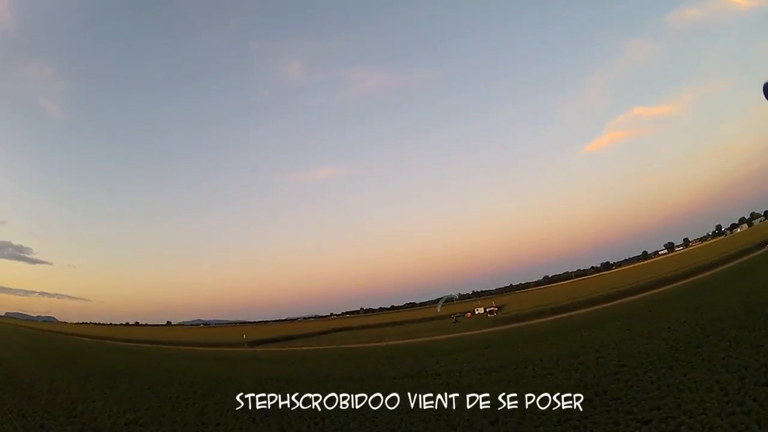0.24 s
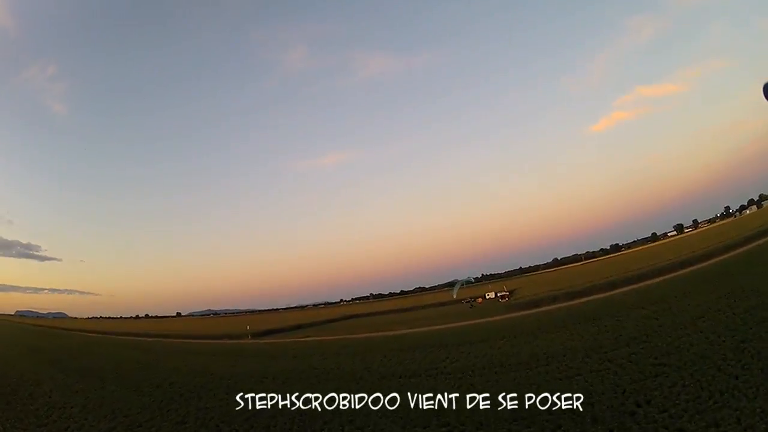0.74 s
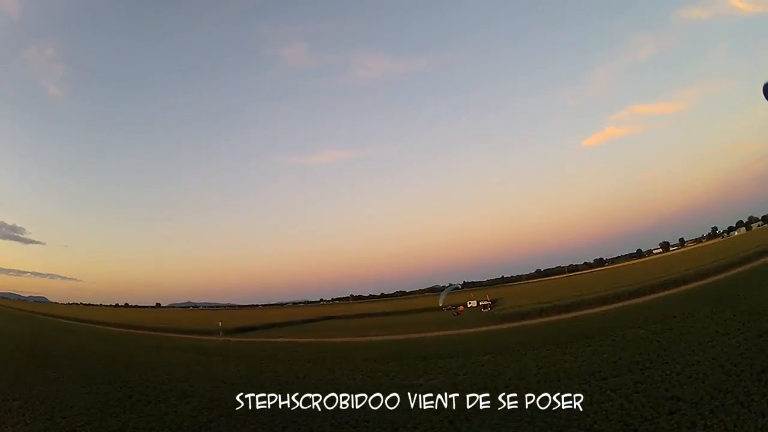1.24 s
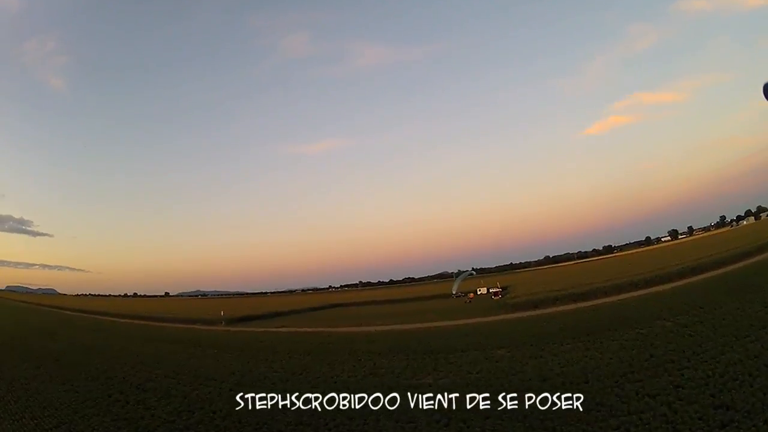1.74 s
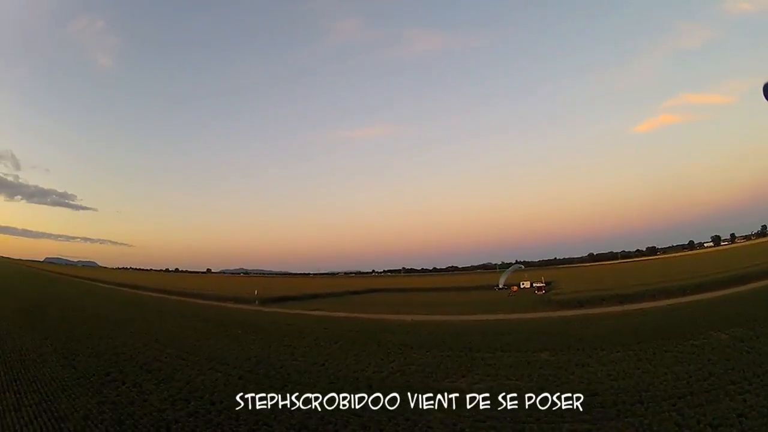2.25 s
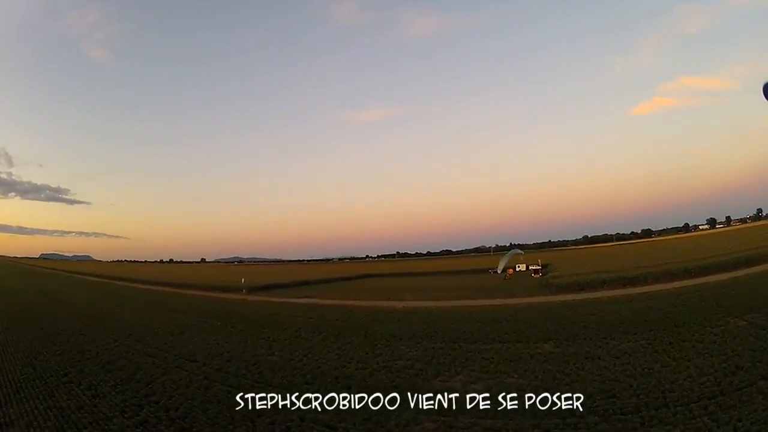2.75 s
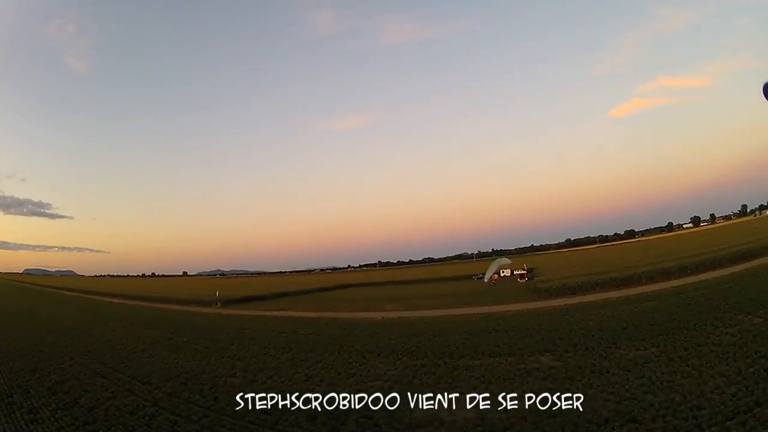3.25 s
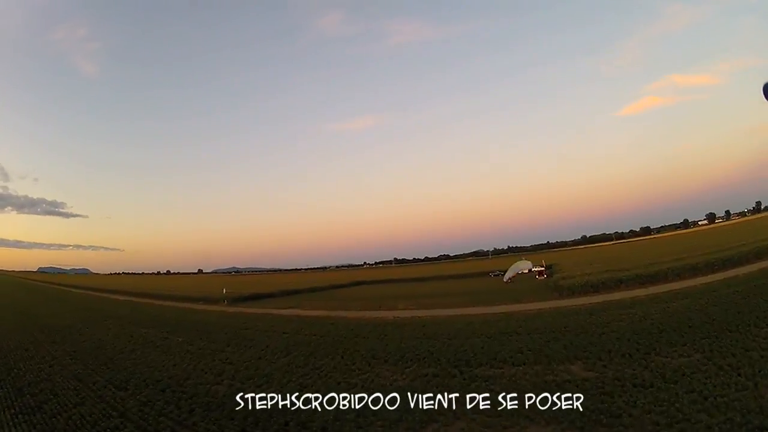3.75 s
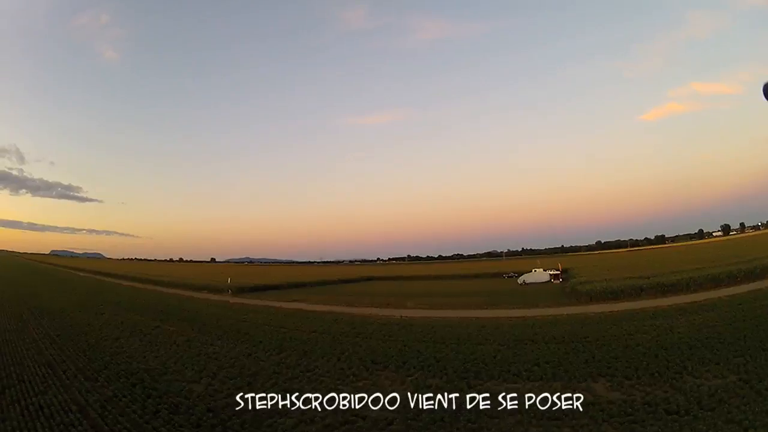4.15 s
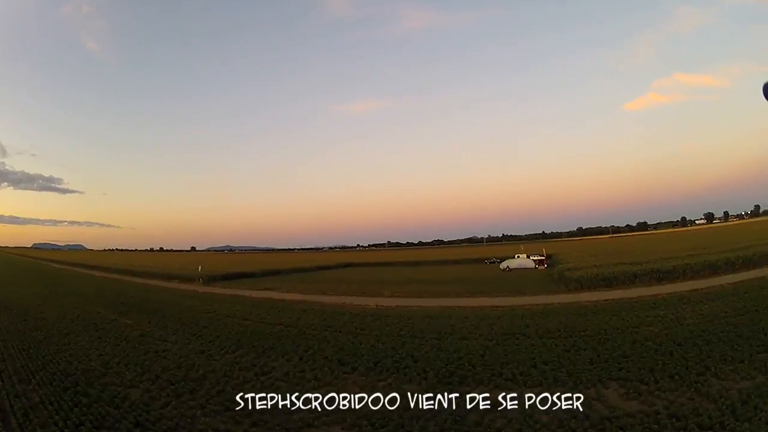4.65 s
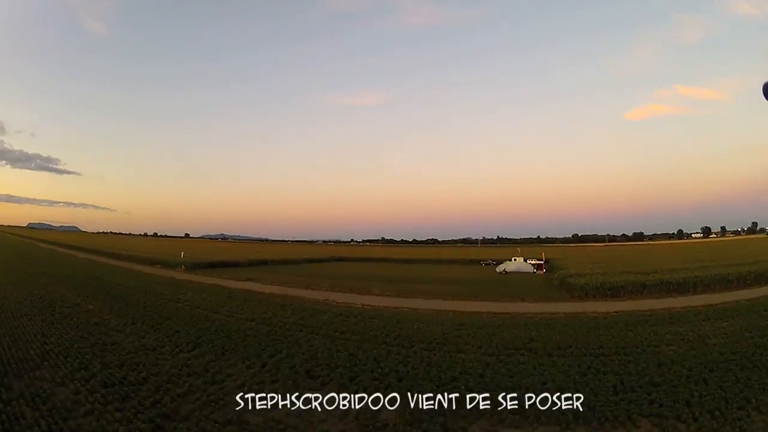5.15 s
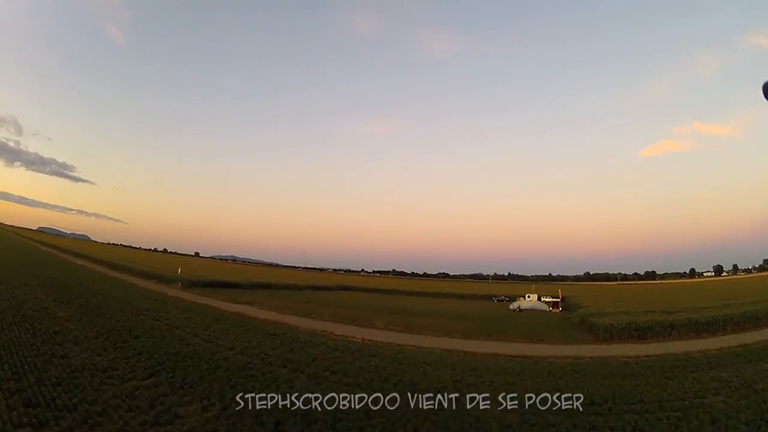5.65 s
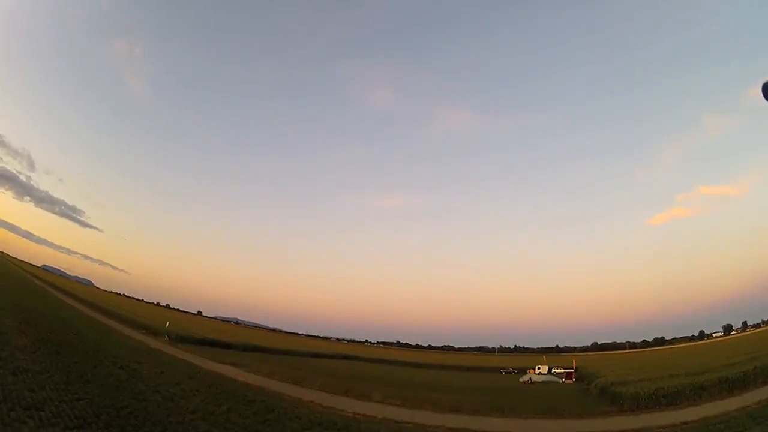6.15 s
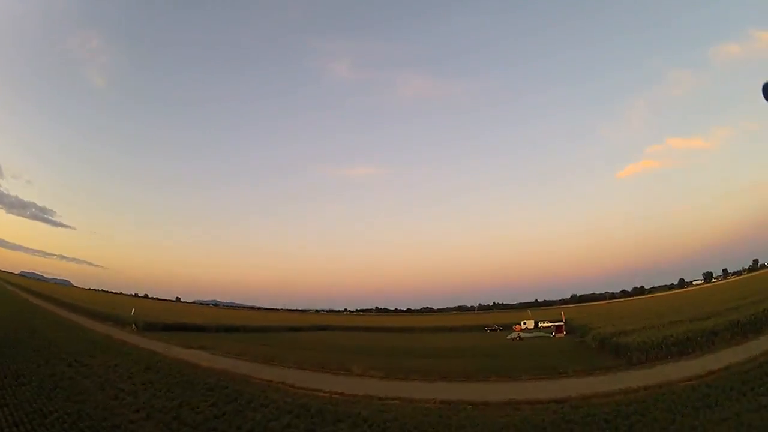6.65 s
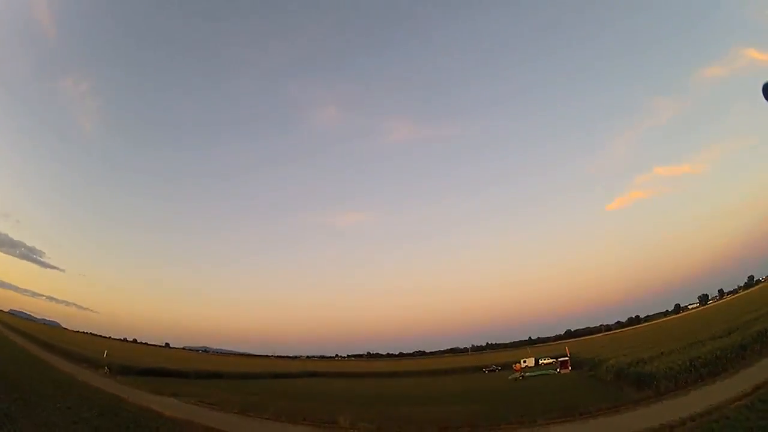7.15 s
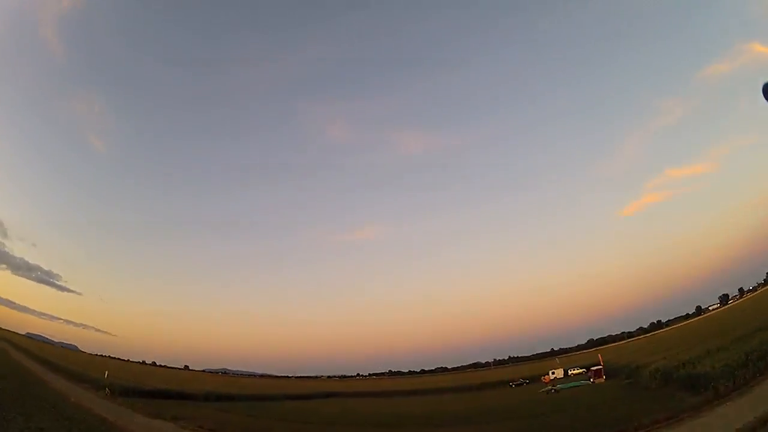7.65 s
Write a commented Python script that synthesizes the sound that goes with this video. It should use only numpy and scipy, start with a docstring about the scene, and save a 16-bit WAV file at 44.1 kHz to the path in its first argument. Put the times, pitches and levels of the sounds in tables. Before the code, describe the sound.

A small two-stroke engine and belt-driven two-blade propeller run without pause for eight seconds, right behind a microphone in a closed hard case. From 0 to 1 s the buzzing drone sits near 112 Hz, then sags to about 105 Hz around 2.2 s, its hum flickering unevenly. From 2.5 s it revs up, passing 120 Hz near 4 s and reaching a steady 125 Hz around 6 s; the low hum is strongest and most throbbing between 5 and 6.2 s. After 6.8 s the exhaust softens and the pitch slides down to about 110 Hz by the end. Throughout, exhaust crackle, blade slaps and gusting slipstream make a boxy, hollow roar over lumpy rumble. Dull mount thumps fall near 1.5, 4.6 and, most clearly, 6.3 s. The sound is dry, close, mono and coarse, with a gritty metallic edge in the treble.

```python
"""Two-stroke propeller engine, close up

A small two-stroke engine drives a two-blade propeller through a belt, right behind a camera in a closed case.
Firing and blade tones shake the mount and mix there, over lumpy low noise and a few short thumps.
Exhaust cracks, blade slaps and slipstream noise reach the one microphone through the ringing case.
The recorder samples slowly and holds each value, which mirrors the sound around its sampling rate."""
import sys
import numpy as np
from scipy import signal
from scipy.fft import rfft, irfft, next_fast_len
from scipy.io import wavfile
from scipy.ndimage import uniform_filter1d

SR = 44100
rng = np.random.default_rng(int(sys.argv[2]) if len(sys.argv) > 2 else 0)


def file_out(sig):
    """Save sig as 16-bit WAV at sys.argv[1]."""
    # one column per channel
    cols = np.atleast_2d(sig).T
    # limit, then scale
    lim = np.clip(cols, -1, 1)
    pcm = np.round(lim * 32767).astype(np.int16)
    wavfile.write(sys.argv[1], SR, pcm)


N = 348374
T = np.arange(N) / SR  # time [s]

# Engine speed: (time [s], firing rate [Hz], lead of the propeller as the belt creeps [blade passes])
SPEED = [(0.0, 112.0, -0.021), (0.4, 111.8, -0.022), (0.65, 110.95, -0.026), (1.2, 110.0, -0.041),
         (1.9, 105.85, -0.06), (2.2, 105.45, -0.089), (2.6, 107.35, -0.11), (3.0, 111.15, -0.125),
         (3.2, 112.7, -0.129), (4.0, 120.95, -0.136), (4.4, 122.6, -0.131), (5.2, 124.3, -0.124),
         (6.0, 125.05, -0.082), (6.6, 125.0, -0.078), (6.85, 124.35, -0.077), (7.1, 121.8, -0.065),
         (7.6, 116.3, -0.068), (7.9, 109.75, -0.069)]
BLADES_PER_FIRING = .5204  # blade passes per firing: two blades over the belt reduction
CRUISE_HZ = 115  # firing rate at which the speed-dependent levels hold

# Strong mount tones, firing tone first: (multiple of firing rate [-], multiple of blade rate [-])
STRONG_TONES = [(1, 0), (2, 0), (3, 0), (1, -1), (1, 1), (0, 1), (0, 3), (0, 4), (0, 5), (0, 8), (0, 9),
                (1, 2)]
# Firing tone in the mount: (time [s], level [dB])
FIRING_TONE = [(0.0, -22.5), (0.2, -18), (0.42, -22), (0.55, -20), (0.77, -18.5), (0.88, -29), (1.2, -30),
               (1.45, -27), (1.76, -27), (2.09, -31.5), (2.2, -17), (2.42, -29), (2.64, -18.5),
               (2.97, -31.5), (3.08, -28), (3.4, -23), (3.96, -22), (4.18, -19.5), (4.62, -20), (4.84, -26),
               (5.06, -17), (5.55, -10.5), (5.72, -15), (5.94, -8), (6.16, -16), (6.27, -24), (6.38, -21),
               (6.5, -32), (6.71, -22.5), (6.93, -23.5), (7.26, -15.5), (7.7, -16.5), (7.9, -20)]
# Next five strong tones: (time [s], second firing tone [dB], third firing tone [dB],
# firing minus blade rate [dB], firing plus blade rate [dB], blade tone [dB])
MOUNT_TONES = [(0.0, -29.5, -50, -25, -57, -52), (1.2, -23, -48, -25, -49, -37),
               (1.7, -32, -41, -28, -50, -36), (2.0, -27.5, -47, -25, -50, -32),
               (2.4, -28, -27, -26.5, -29, -47), (2.7, -34, -31, -26, -35, -46),
               (3.0, -31.5, -53, -25, -39, -41), (3.7, -22, -52, -23, -47, -49),
               (4.0, -21, -47, -20.5, -43, -47), (4.4, -20, -35, -20.5, -29, -48),
               (4.65, -19.5, -46, -22, -45, -43), (4.9, -16, -32.5, -30, -35, -28),
               (5.25, -13.5, -30, -18, -22.5, -22.5), (5.8, -18, -48, -18, -19, -27),
               (6.05, -19.5, -54, -21, -21, -25), (6.3, -17, -41, -23, -32, -25),
               (6.6, -19.5, -36, -43, -27, -37), (7.2, -22, -52, -48, -31, -47),
               (7.9, -33.5, -38, -41, -26, -47)]
# Third, fourth, fifth, eighth and ninth blade tones:
# (level at cruise [dB], slope with firing rate [dB/Hz], fade after FADE_START_S [dB/s])
BLADE_TONES = [(-30.5, 0.45, -50), (-27, -0.07, -50), (-40.5, -0.73, -19.5), (-44.5, -0.08, -11),
               (-54, -0.6, -50)]
FADE_START_S = 7.89  # these blade tones start to fade
# Firing plus twice blade rate sets in around this firing rate: (level below [dB], level above [dB])
ONSET_DB = (-57, -31)
ONSET_HZ, ONSET_WIDTH_HZ = 117, 0.48
# Weak mount tones: (multiple of firing rate [-], multiple of blade rate [-], place of its strong tone [-])
WEAK_TONES = [(0, .5, 7), (1, -.5, 5), (1, .5, 5), (2, -.5, 5), (0, 1.5, 5), (2, -1, 4), (2, -2, 4),
              (3, -1, 1), (2, 1, 1), (3, 1, 4), (4, 0, 1), (1, 3, 7), (5, 0, 4), (0, 6, 6), (0, 7, 6)]
# The weak tones in the same order: (mean level against the strong tone [dB])
WEAK_DB = [-19, -6, -9, -11, -12, -8, -13, -15, -17, -20, -29, -18, -25, -15, -17]
TAUT_START_S, TAUT_END_S = .9, 6.4  # the mount is pulled taut
TAUT_TURNS = .22  # meanwhile the firing tone runs ahead

# Exhaust firing multiples 5 to 22: (mean relative level [dB])
CRACK_DB = [-9, -8, -7, 1, 5, 0, 1, -5, -8, -2, 4, 2, 0, -6, -6, -4, -8, -7]
# Exhaust pipe resonances: (centre [Hz], width [Hz], relative level [dB])
PIPE_MODES = [(957, 45, 4), (1106, 60, 2), (1215, 60, 0), (1872, 60, -1), (1945, 60, 2)]
# Exhaust between the pipe's modes: (frequency [Hz], relative level [dB])
PIPE_LEAK = [(500, 0), (900, -6), (1400, -4), (1700, -10), (2000, -9), (2200, -1)]
EASE_START_S, EASE_END_S, EASE_DB = 6.75, 7.1, -7  # the cracks soften as the throttle eases
# Slap multiples 10 to 23 of the blade rate: (mean relative level [dB])
SLAP_DB = [-5, -6, -6, -5, -4, -1, 0, 3, 0, 5, 1, -2, -2, -4]
# Slipstream eddies, each size coming and going separately: (low edge [Hz], high edge [Hz])
GUST_BANDS = [(100, 1550), (1550, 2850), (2850, 7000)]
# Case resonances: (centre [Hz], width [Hz], relative level [dB])
CASE_MODES = [(959, 30, -4.5), (1105, 180, -8.5), (1208, 155, -2), (1892, 260, 3.5), (1810, 180, -10),
              (2408, 211, 2.5), (3061, 178, -10), (3465, 280, -14.5), (3660, 400, -12), (5274, 510, -20)]
# Sound through the case between its modes: (frequency [Hz], relative level [dB])
CASE_LEAK = [(300, -10.5), (500, -12), (800, -11.5), (1500, -11.5), (2200, -4), (2900, -34), (4300, -25),
             (5600, -29.5), (6000, -47)]
# Roar in the case: (level at cruise [dB], slope with firing rate [dB/Hz], rise with speeding up [dB per Hz/s])
ROAR = (-24, 0.24, 0.027)

# Spectrum of the low thudding: (frequency [Hz], relative density [dB per Hz])
THUD = [(15, -39), (35, -18), (45, 0), (70, 2), (100, -11), (200, -44.5)]
# Spectrum of the rumble: (frequency [Hz], relative density [dB per Hz])
RUMBLE = [(40, -18.5), (75, -5.5), (95, -0.5), (140, -3), (200, 4), (260, -9), (500, -24.5), (900, -40)]
# Spectrum of the buzz above them: (frequency [Hz], relative density [dB per Hz])
BUZZ = [(150, -23), (230, -1), (280, 4), (330, -3), (380, -10), (600, -26), (900, -39)]
# Thud, rumble and buzz, each following a strong tone:
# (place of the tone [-], offset [dB], share of the tone's level [dB/dB], slope with firing rate [dB/Hz])
LUMPS = [(5, -18, 0.4, -0.17), (0, -17, 0.53, 0.19), (3, -20.5, 0.41, -0.03)]
LUMP_SMOOTHING_S = 0.49  # span over which the followed level is averaged
# Thumps of the mount: (time [s], envelope peak [dB], pitch [Hz], length [s])
JOLTS = [(1.547, -15, 62, 0.04), (4.628, -15, 62, 0.1), (6.312, -9, 85.5, 0.03), (6.38, -21, 35.5, 0.17)]

EDGE_HZ = 15300  # upper band limit of the recorder


def gain_of(db):
    """Decibels to a factor."""
    return 10 ** (np.asarray(db) / 20)


def evened(x):
    """Scales to rms 1."""
    return x / np.sqrt(np.mean(x ** 2) + 1e-20)


def curves(rows):
    """One array per column, joined by straight lines in time."""
    s, *columns = np.transpose(rows)
    return [np.interp(T, s, column) for column in columns]


def wander(rate_hz):
    """Slow random drift of rms 1, with little change faster than the given rate."""
    step = 64  # samples between drawn values
    low_pass = signal.butter(2, rate_hz, fs=SR / step, output="sos")
    slow = evened(signal.sosfilt(low_pass, rng.standard_normal(N // step + 1)))
    return np.interp(np.arange(N) / step, np.arange(len(slow)), slow)


def spectrum_grid():
    """Transform length and the frequency of each bin in Hz."""
    size = next_fast_len(N)
    return size, np.arange(size // 2 + 1) * SR / size


def coloured(x, points, modes=()):
    """Filters by a smooth spectrum plus resonances, which ring after the blow."""
    size, hz = spectrum_grid()
    f, db = np.transpose(points)
    power = gain_of(np.interp(np.log(hz + 1), np.log(f), db)) ** 2
    for centre_hz, width_hz, mode_db in modes:
        detuning = 2 * (hz - centre_hz) / width_hz
        power = power + gain_of(mode_db) ** 2 / (1 + detuning ** 2) ** 2
    log_gain = np.log(power + 1e-12) / 2
    # Minimum phase keeps the filter causal
    circle = np.concatenate([log_gain, log_gain[-2 + size % 2:0:-1]])
    phase = -signal.hilbert(circle).imag[:len(hz)]
    return irfft(rfft(x, size) * np.exp(log_gain + 1j * phase), size)[:N]


def turns():
    """Running count of firings, from the crank's starting angle, and of blade passes; the crank hunts a little."""
    firing_hz, lead = curves(SPEED)
    firing = np.cumsum(firing_hz * (1 + .0003 * wander(6))) / SR
    return firing + 0.1679, BLADES_PER_FIRING * firing + lead


def tone_levels():
    """Levels in dB of the strong tones: six from curves, the others from the speed, five with a late fade."""
    hz = curves(SPEED)[0]
    fading_s = np.maximum(T - FADE_START_S, 0)
    blade_db = [db + slope * (hz - CRUISE_HZ) + fade * fading_s for db, slope, fade in BLADE_TONES]
    low_db, high_db = ONSET_DB
    onset = 1 / (1 + np.exp((ONSET_HZ - hz) / ONSET_WIDTH_HZ))
    mixed_db = low_db + (high_db - low_db) * onset
    return curves(FIRING_TONE) + curves(MOUNT_TONES) + blade_db + [mixed_db]


def mount_tones(firing, blades):
    """Firing and blade tones shake the mount with their sums and differences, each wavering on its own."""
    level_db = tone_levels()
    tones = [(m, n, db) for (m, n), db in zip(STRONG_TONES, level_db)]
    for (m, n, k), db in zip(WEAK_TONES, WEAK_DB):
        tones.append((m, n, level_db[k] + db + 2.5 * wander(1.2)))  # these swell and fade
    # Moves in and out over 0.1 s
    taut = np.clip(np.minimum(T - TAUT_START_S, TAUT_END_S - T) / .1, 0, 1)
    out = np.zeros(N)
    for m, n, db in tones:
        # Sums and differences are out of step with the pure tones [turns]
        shift = .5 * (m * n > 0) - .32 * (m * n < 0) + .015 * wander(5)
        if (m, n) == (1, 0):
            shift = shift + TAUT_TURNS * taut
        level = np.sqrt(2) * gain_of(db + .7 * wander(5))
        out += level * np.cos(2 * np.pi * (m * firing + n * blades + shift))
    return out


def pulses(count_of_turns, levels_db, order):
    """One smeared pulse a turn, from a lowest multiple up; each multiple swells and wavers by itself."""
    spread = .031  # higher multiples come later [turns]
    out = np.zeros(N)
    for k, db in enumerate(levels_db, order):
        level = gain_of(db + 2.2 * wander(1.2))
        out += level * np.cos(2 * np.pi * k * (count_of_turns - spread * k + .004 * wander(8)))
    return out / np.sqrt(len(levels_db) / 2)


def slipstream(blades):
    """Air noise that throbs with each blade pass, its bands of eddies gusting separately."""
    air = (1 + 0.14 * np.cos(2 * np.pi * blades)) * rng.standard_normal(N)
    size, hz = spectrum_grid()
    spectrum = rfft(air, size)
    out = np.zeros(N)
    for low, high in GUST_BANDS:
        band = irfft(spectrum * ((hz >= low) & (hz < high)), size)[:N]
        out += gain_of(0.38 * wander(5.1) + 0.65 * wander(30)) * band
    return out


def exhaust_cracks(firing):
    """A pulse per firing rings the exhaust pipe, softening as the throttle eases."""
    easing_db = np.interp(T, (EASE_START_S, EASE_END_S), (0, EASE_DB))
    return gain_of(-15 + easing_db) * coloured(pulses(firing, CRACK_DB, order=5), PIPE_LEAK, PIPE_MODES)


def blade_slaps(blades):
    """Each passing blade slaps the air with one pulse."""
    return gain_of(-16) * pulses(blades, SLAP_DB, order=10)


def roar_level():
    """Level in dB: louder with speed, and while the engine pulls up to speed."""
    hz = curves(SPEED)[0]
    cruise_db, slope, rise = ROAR
    speeding_up = uniform_filter1d(np.gradient(hz) * SR, SR // 2)  # [Hz/s], averaged over half a second
    return cruise_db + slope * (hz - CRUISE_HZ) + rise * speeding_up


def case_roar(firing, blades):
    """Exhaust cracks, blade slaps and slipstream ring the closed case around the microphone."""
    outside = slipstream(blades) + exhaust_cracks(firing) + blade_slaps(blades)
    return gain_of(roar_level()) * evened(coloured(outside, CASE_LEAK, CASE_MODES))


def rumble():
    """Lumpy low noise on the mount: thudding, rumble and a buzz above them, each swelling with one tone."""
    level_db = tone_levels()
    faster_hz = curves(SPEED)[0] - CRUISE_HZ
    out = np.zeros(N)
    for (k, db, share, slope), colour in zip(LUMPS, (THUD, RUMBLE, BUZZ)):
        followed_db = uniform_filter1d(level_db[round(k)], int(LUMP_SMOOTHING_S * SR))
        noise = coloured(rng.standard_normal(N), colour)
        lumpy = evened(gain_of(1.1 * wander(10)) * noise)
        out += gain_of(db + slope * faster_hz + share * followed_db) * lumpy
    return out


def jolts():
    """Short low thumps of the mount: sine bursts under a bell-shaped envelope."""
    out = np.zeros(N)
    for s, db, hz, length_s in JOLTS:
        envelope = np.exp(-(2 * (T - s) / length_s) ** 2)
        out += gain_of(db) * envelope * np.sin(2 * np.pi * hz * (T - s))
    return out


def scene():
    """All sources at the one microphone."""
    firing, blades = turns()
    return (mount_tones(firing, blades) + case_roar(firing, blades) + rumble() + jolts())[None]


def record(dry):
    """Samples at 12 kHz, cuts the deepest bass, clips, holds each value for four steps of 48 kHz, limits the band."""
    slow = signal.resample_poly(dry, 40, 147, axis=1, window=("kaiser", 8))
    bass_cut = signal.butter(2, 24, "high", fs=12000, output="sos")
    slow = np.clip(signal.sosfilt(bass_cut, slow), -.98, .98)
    # The stepped hold leaves mirror images around 12 kHz
    held = signal.resample_poly(np.repeat(slow, 4, axis=1), 147, 160, axis=1)[:, :N]
    held = np.pad(held, ((0, 0), (0, N - held.shape[1])))
    band_limit = signal.firwin(511, EDGE_HZ, window=("kaiser", 9), fs=SR)
    limited = signal.oaconvolve(held, band_limit[None], "same")
    return np.clip(limited, -1, 1)


dry = scene()
out = record(dry)
file_out(out)
```